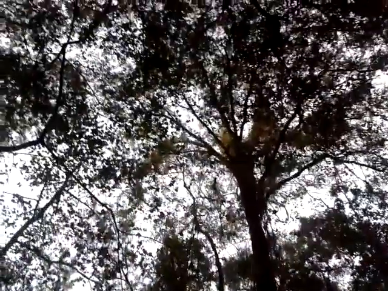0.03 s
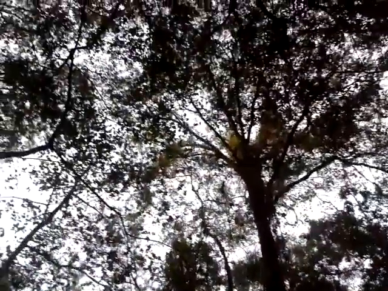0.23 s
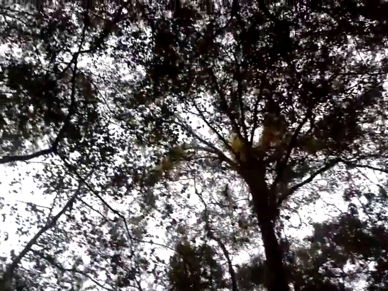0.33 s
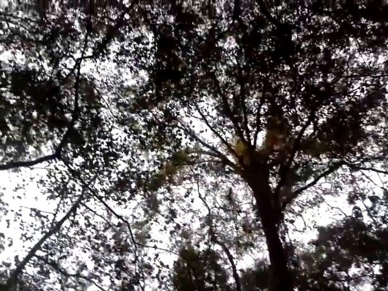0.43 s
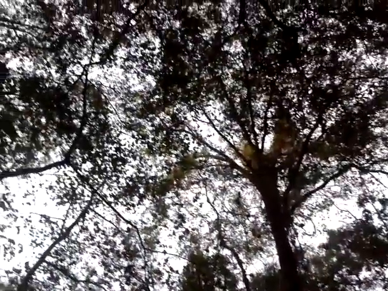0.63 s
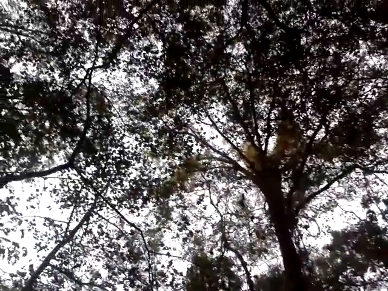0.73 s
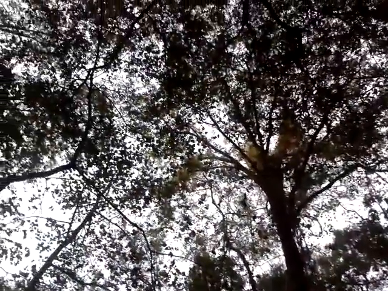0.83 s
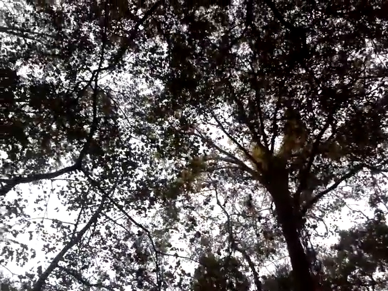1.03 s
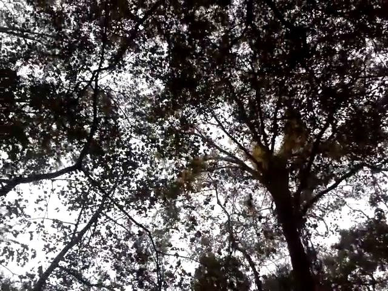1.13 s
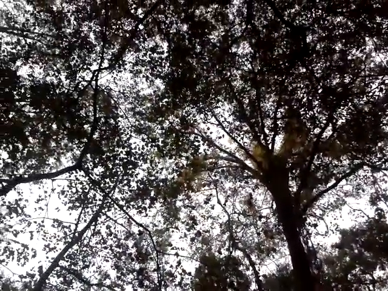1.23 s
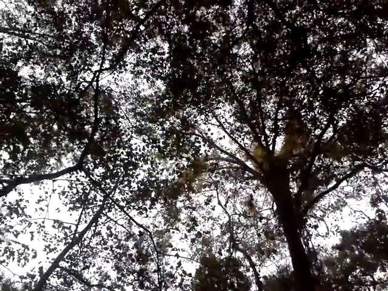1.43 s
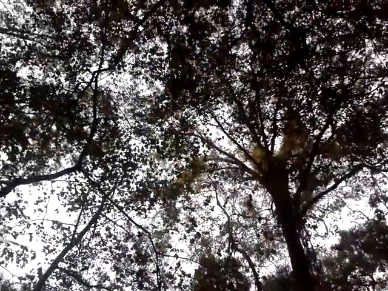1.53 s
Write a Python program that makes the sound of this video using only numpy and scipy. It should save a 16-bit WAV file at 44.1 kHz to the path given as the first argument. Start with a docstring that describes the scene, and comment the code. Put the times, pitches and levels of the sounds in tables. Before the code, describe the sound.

A small bird gives two sharp, very high chirps, at about 0.2 and 1.0 seconds. Each is a tiny whistle sweeping quickly upward, followed by a bright echo fading through the trees within half a second. A few faint, low hoots sound far off between 0.1 and 1.0 seconds. A soft low wash of air and the thin steady shrill of distant insects continue throughout.

```python
"""In a wood, on one microphone. A low wash of air and the steady shrill of distant insects lie
behind everything, with a few faint hoots far off. Nearer, a small bird gives two sharp rising
chips. Each whistle reaches the microphone straight through the foliage, then again as a bright
tail scattered by leaves, trunks and the canopy."""
import sys
import numpy as np
from scipy import signal
from scipy.fft import rfft, irfft
from scipy.io import wavfile
from scipy.ndimage import uniform_filter1d

SR = 44100
rng = np.random.default_rng(int(sys.argv[2]) if len(sys.argv) > 2 else 0)


def to_wav(s):
    """Save 16-bit WAV."""
    ch = np.atleast_2d(s).T  # columns
    pcm = np.round(np.clip(ch, -1, 1) * 32767)  # PCM
    wavfile.write(sys.argv[1], SR, pcm.astype(np.int16))


N = 70560


def amp(db):
    """Decibels to gain."""
    return 10 ** (np.asarray(db) / 20)


def unit(x):
    """Scales to an rms of one."""
    return x / np.sqrt(np.mean(x ** 2) + 1e-20)


def add(mix, s, sound):
    """Mixes a sound in at a time."""
    part = mix[round(s * SR):][:len(sound)]
    part += sound[:len(part)]


def band(hz, width):
    """Noise in one resonance, rms one."""
    f = np.fft.rfftfreq(N, 1 / SR)
    return unit(irfft(rfft(rng.standard_normal(N)) / (1 + ((f - hz) / width * 2) ** 2) ** 1.08, N))


# Spectrum of the air all around: f/Hz, relative level/dB
AIR_SPECTRUM = [(20, -5), (45, 2), (150, -0.5), (400, -2), (700, -6.5), (1200, -11.5), (2500, -13.5),
                (5000, -15.5), (9500, -19.5), (16000, -18)]


def air(level_db=-64, patch_db=1):
    """A steady low wash of noise, with faint patches drifting through its spectrum."""
    frames, hz = N // 256 + 5, np.fft.rfftfreq(1024, 1 / SR)
    real, imag, patches = rng.standard_normal((3, frames, len(hz)))
    patches = uniform_filter1d(patches, size=14, axis=0)  # smooth in time
    patches = unit(uniform_filter1d(patches, size=12, axis=1))  # and in frequency
    f, db = np.transpose(AIR_SPECTRUM)
    colour_db = np.interp(np.log(hz + 1), np.log(f), db)
    spectra = (real + 1j * imag) * amp(colour_db + patch_db * patches)
    wash = signal.istft(spectra.T, nperseg=1024, noverlap=768)[1][:N]
    return amp(level_db) * unit(wash)


# Insect chorus in the distance: centre f/Hz, width/Hz, level/dB
INSECT_BANDS = [(7390, 180, -70.5), (7445, 1240, -70), (5855, 280, -80)]


def insects(flutter_depth=0.091, flutter_hz=57):
    """Many far insects blur into narrow, fluttering bands."""
    chorus = sum(amp(db) * band(hz, width) for hz, width, db in INSECT_BANDS)
    return chorus * (1 + flutter_depth * band(flutter_hz, width=60))


# Faint hoots far off: start t/s, length/s, mid f/Hz, level/dB
FAR_HOOTS = [(.125, .05, 431, -66), (0.131, 0.051, 490, -67), (0.133, 0.11, 654, -72),
             (.31, 0.26, 420, -69.5), (0.722, 0.26, 409.5, -71.5)]


def hoots(pitch_sag=0.042, blur_hz=14):
    """Soft sagging tones, blurred by distance."""
    out = np.zeros(N)
    for start, length, mid_hz, db in FAR_HOOTS:
        progress = np.arange(0, length, 1 / SR) / length
        swell = np.sqrt(np.sin(np.pi * progress))
        blur = 1 + 0.42 * band(0, 2 * blur_hz)[:len(progress)]
        hz = mid_hz * (1 - pitch_sag * (progress - .5))
        tone = np.sin(2 * np.pi * np.cumsum(hz) / SR)
        add(out, start, amp(db) * swell * blur * tone)
    return out


# The whistle's second harmonic: its own f/Hz, level/dB re the fundamental
OCTAVE_LEVELS = [(11200, -16), (12450, -6), (13300, -43), (14000, -35), (14900, -32), (15800, -33)]


def chip(length, first_hz, last_hz, db, opening_db, bend, attack_s=0.0019, release_s=0.0049):
    """A pure whistle that shoots upward and swells, with a weak octave strongest early on."""
    t = np.arange(0, length, 1 / SR)
    progress = t / length
    glide = (1 - np.exp(-bend * progress)) / (1 - np.exp(-bend))
    hz = first_hz + (last_hz - first_hz) * glide
    phase = 2 * np.pi * np.cumsum(hz) / SR
    attack = np.sin(np.pi / 2 * np.minimum(t / attack_s, 1)) ** 2
    release = np.sin(np.pi / 2 * np.minimum((length - t) / release_s, 1)) ** 2
    swell = amp(db + opening_db * np.maximum(1 - progress / 0.44, 0))  # full from 44% of the length
    octave = amp(np.interp(2 * hz, *np.transpose(OCTAVE_LEVELS)))
    return attack * release * swell * (np.sin(phase) + octave * np.sin(2 * phase))


# Echoes off near leaves, then the far canopy: delay t/s, build-up/s, t60/s, level/dB
LEAF_ECHOES = [(.002, 0.0026, 0.078, -4), (0.024, 0.019, 0.57, -6.5)]
# Cluster of echoes off the trunks: delay t/s, build-up/s, t60/s
TRUNK_ECHOES = (0.02, 0.0081, 0.1)


def wood_response(trunk_db):
    """Dense echoes from leaves, trunks and canopy build up and die away at the microphone."""
    t = np.arange(SR) / SR
    response = np.zeros(SR)
    for delay, build, t60, db in [*LEAF_ECHOES, (*TRUNK_ECHOES, trunk_db)]:
        age = np.maximum(t - delay, 0)
        envelope = (1 - np.exp(-age / build)) * amp(-60 * age / t60)
        tail = rng.choice([-1., 1.], SR) * envelope
        response += amp(db) * tail / np.linalg.norm(tail)
    return response


# The bird's chips: start t/s, trunk echo level/dB, length/s, first f/Hz, last f/Hz,
# peak level/dB before the foliage, opening level/dB re the peak, flattening of the glide
BIRD_CHIPS = [(0.2065, -3.5, 0.027, 5707, 8285, -31, -16.5, 1.795),
              (.9790, -6, .028, 5550, 8050, -32, -12.5, 1.93)]
# Direct path through the foliage to the microphone: f/Hz, gain/dB
FOLIAGE_COLOUR = [(5500, 7), (6500, 1.5), (7500, -0.5), (7850, -3.5), (8200, -11), (12000, -2), (14500, 2)]


def bird():
    """Each chip arrives straight through the foliage and again as scattered echoes."""
    direct, echoes = np.zeros((2, N))
    for start, trunk_db, *shape in BIRD_CHIPS:
        call = chip(*shape)
        add(direct, start, call)
        add(echoes, start, signal.fftconvolve(call, wood_response(trunk_db)))
    colour = amp(np.interp(np.fft.rfftfreq(N, 1 / SR), *np.transpose(FOLIAGE_COLOUR)))
    return irfft(rfft(direct) * colour, N) + echoes


def scene():
    """The bird in front, insects, hoots and air behind, all at one microphone."""
    return (bird() + insects() + hoots() + air())[None]


def record(dry, cutoff_hz=15740):
    """The recorder's band limit cuts off the highest treble."""
    lowpass = signal.firwin(511, cutoff_hz, window=("kaiser", 9), fs=SR)
    return signal.oaconvolve(dry, lowpass[None], "same")


dry = scene()
out = record(dry)
to_wav(out)
```